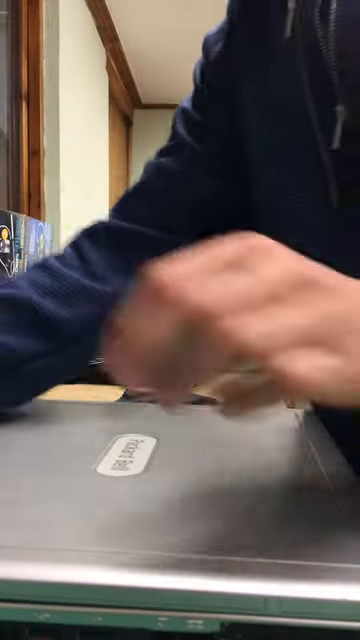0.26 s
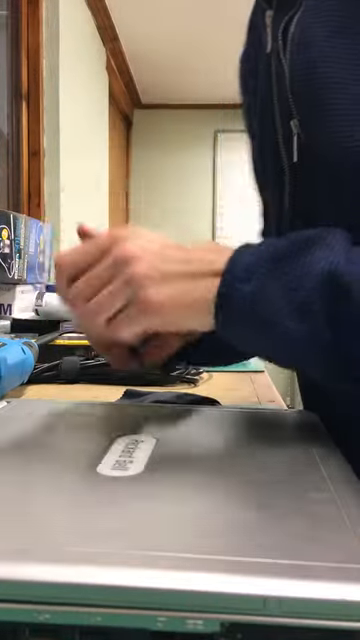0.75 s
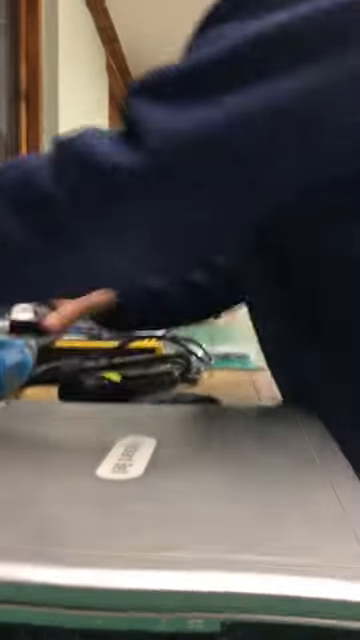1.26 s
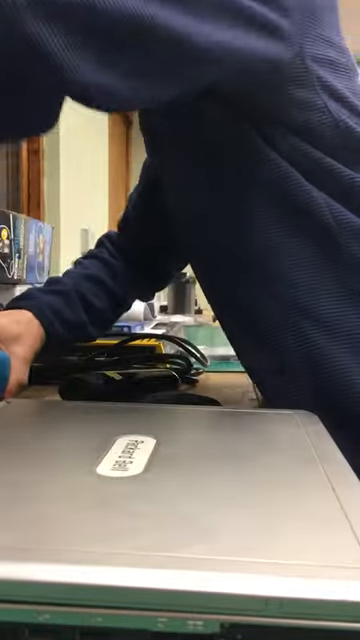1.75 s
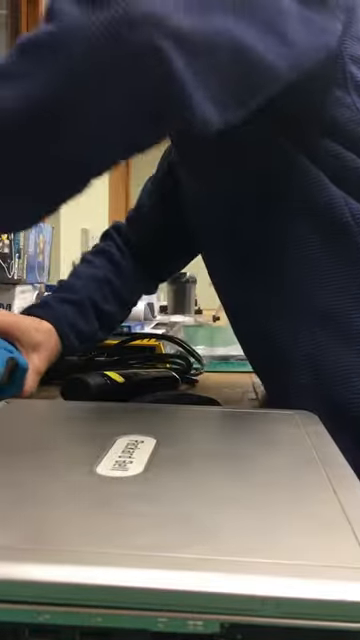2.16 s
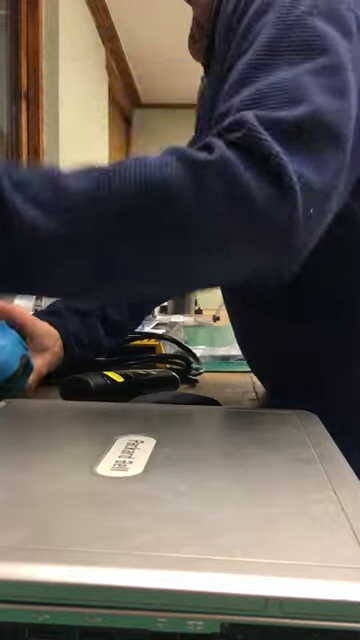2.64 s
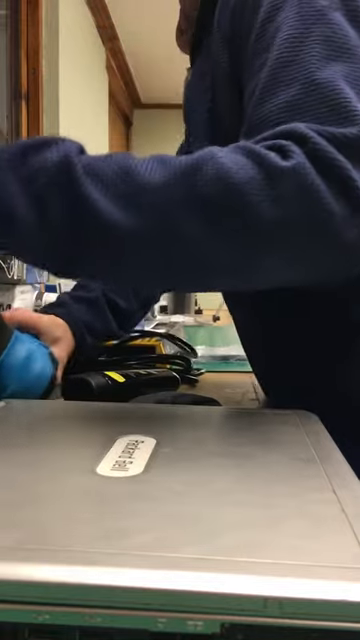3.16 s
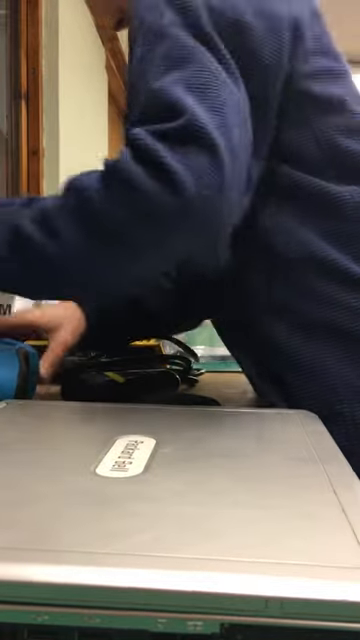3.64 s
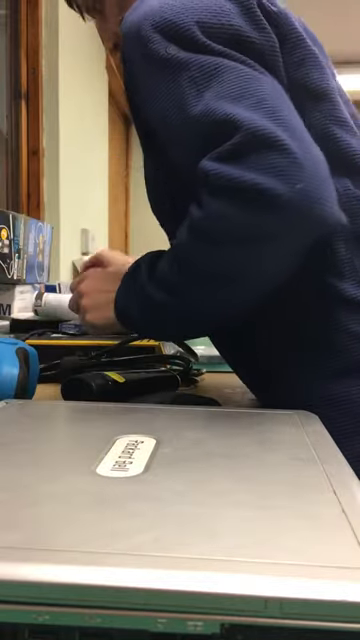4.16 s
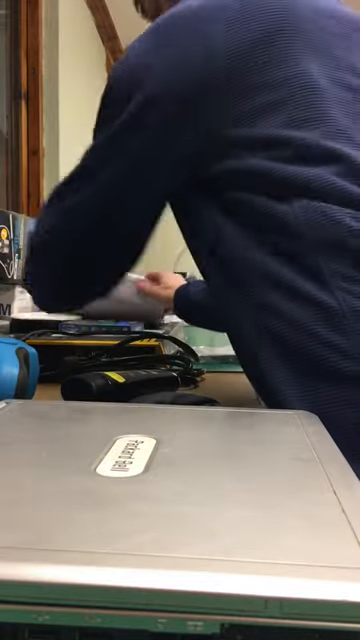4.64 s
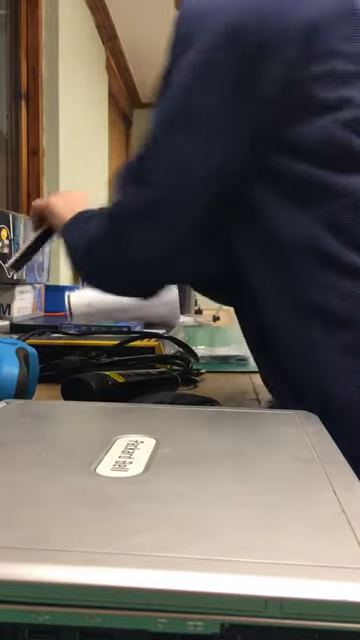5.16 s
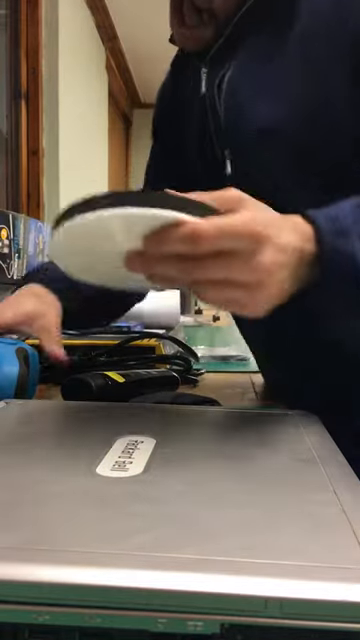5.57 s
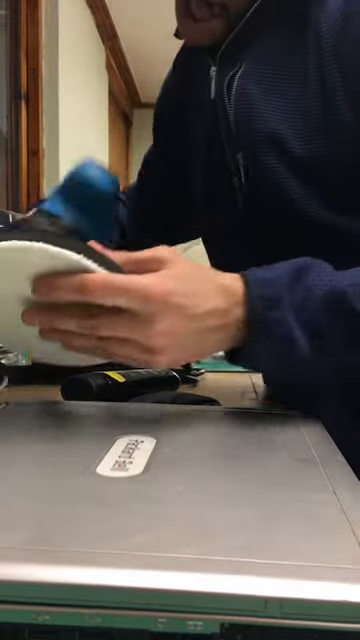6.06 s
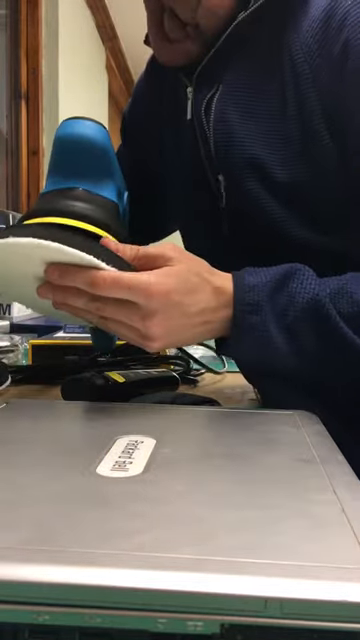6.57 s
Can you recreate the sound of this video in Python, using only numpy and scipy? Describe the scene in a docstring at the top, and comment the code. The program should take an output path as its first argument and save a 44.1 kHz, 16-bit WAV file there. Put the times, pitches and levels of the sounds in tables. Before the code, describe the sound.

Quiet room tone and low hum, heard from the bench itself. Soft cloth swishes lead to a woody knock, then small pops grow into an uneven, harsh fastener rip. Two deep bumps follow, the second loudest with clattering. After a lull come crisp packing crackles and clacks, a quick hand brush, faint handling and one last dull tap.

```python
"""A small workshop with mains hum, heard by a phone standing on the bench where hands are at work.
A polisher is set down and rocks: knocks ring tuned bench modes, and pushes boom as slow decaying sines.
Its hook-and-loop pad is torn off in jerks, made of dense noise grains that also shake the backing plate.
Small parts clack and paper slaps as band-passed noise; packing crinkles and sleeves rustle in grains."""
import sys
import numpy as np
from scipy import signal
from scipy.fft import rfft, irfft, next_fast_len
from scipy.io import wavfile
from scipy.ndimage import uniform_filter1d

SR = 44100
rng = np.random.default_rng(int(sys.argv[2]) if len(sys.argv) > 2 else 0)


def wav_out(sig):
    """Save sig, one row per channel (or a flat mono array), as 16-bit PCM at SR to the path in sys.argv[1]."""
    wavfile.write(sys.argv[1], SR, np.round(np.clip(np.atleast_2d(sig).T, -1, 1) * 32767).astype(np.int16))


N = 300321


def undb(db):
    """Gain of a dB value."""
    return 10 ** (np.asarray(db) / 20)


def level(x, db):
    """Scale x to an rms level in dB."""
    return x * undb(db) / np.sqrt(np.mean(x ** 2))


def fade(t, t60):
    """Exponential decay that falls 60 dB in t60 seconds."""
    return np.exp(-np.log(1000) * t / t60)


def colour(x, spectrum):
    """Filter x by a spectrum of (Hz, dB) points, joined along log frequency; rms 1."""
    hz, db = np.transpose(spectrum)
    size = next_fast_len(len(x))
    f = np.maximum(np.arange(size // 2 + 1) * SR / size, 1)
    gain = undb(np.interp(np.log(f), np.log(hz), db))
    return level(irfft(rfft(x, size) * gain, size)[:len(x)], 0)


def curve(table, column):
    """Gain over time, joining the values of one dB column in straight dB lines."""
    rows = np.array(table)
    return undb(np.interp(np.arange(N) / SR, rows[:, 0], rows[:, column]))


def walk(rate):
    """Random levels held 1 / rate s with slewed steps; spread near 1."""
    hold = int(SR / rate)
    steps = np.repeat(rng.standard_normal(N // hold + 1), hold)
    return uniform_filter1d(steps, hold // 2 + 1)[:N]


def grains(rate, spread_db, smear_s):
    """Random bursts, rate a second, a few much larger than the rest, each a short puff of fresh noise."""
    when, size = rng.random((2, N))
    power = (when < rate / SR) * undb(-2 * spread_db * np.log(size + 0.0055))
    keep = fade(2 / SR, smear_s)  # two samples' amplitude decay is one sample's power decay
    return np.sqrt(signal.lfilter([1], [1, -keep], power)) * rng.standard_normal(N)


def add(out, s, sound, db):
    """Mix a sound in at s seconds with the given peak in dB."""
    i = int(s * SR)
    out[i:i + len(sound)] += (sound * undb(db) / np.abs(sound).max())[:N - i]


def band(x, hz, width):
    """Resonant band-pass."""
    return signal.lfilter(*signal.iirpeak(hz, hz / width, SR), x)


def double_band(x, hz, width):
    """Two equal band-passes in a row, for steeper skirts."""
    return band(band(x, hz, width), hz, width)


def treble(noise):
    """The bright top of a noise."""
    return double_band(noise, 10000, 9300)


# Room tone. Each row: frequency in Hz, relative density in dB per Hz.
AIR_SPECTRUM = [(76, -19.5), (130, -6.5), (156, -11), (228, -8.5), (472, -21.5), (554, -18.5), (863, -27.5),
                (2320, -30.5), (4980, -38), (11400, -44.5), (16000, -45.5)]
# Mains hum. Each row: frequency in Hz, rms level in dB that the flicker moves around.
HUM_TONES = [(100, -55.5), (200, -71)]
AIR_DB = -62.5  # the breathing moves around this
RUMBLE_HZ, RUMBLE_WIDTH_HZ, RUMBLE_DB = 59, 30, -57.5


def air():
    """Coloured noise that breathes a little, a wavering mains hum and the bench trembling at rest."""
    t = np.arange(N) / SR
    tone = undb(AIR_DB + 0.8 * walk(1.93)) * colour(rng.standard_normal(N), AIR_SPECTRUM)
    hum = np.zeros(N)
    for hz, db in HUM_TONES:
        flicker = undb(db + 3.5 * walk(15))
        wander = 1.3 * walk(5.3)  # phase in radians
        hum += flicker * np.sqrt(2) * np.sin(2 * np.pi * hz * t + wander)
    rumble = double_band(rng.standard_normal(N), RUMBLE_HZ, RUMBLE_WIDTH_HZ)
    return tone + hum + level(rumble, RUMBLE_DB)


# How long the walls answer. Each row: frequency in Hz, t60 in seconds.
ROOM_DECAY = [(250, 0.42), (1000, 0.18), (4000, 0.25), (12000, 0.15)]
ROOM_DB = -9  # energy of the echoes against the dry sound


def room(dry):
    """Diffuse echoes: decaying noise, octave by octave, the lowest octaves lasting longest."""
    t = np.arange(SR) / SR
    hz, t60 = np.transpose(ROOM_DECAY)
    tail = np.zeros(SR)
    for f in 180 * 2. ** np.arange(7):
        octave = level(band(rng.standard_normal(SR), f, f), 0)
        octave_t60 = np.interp(np.log(f), np.log(hz), t60)
        tail += np.sqrt(f) * octave * fade(t, octave_t60)
    tail = tail * (t > 0.004)  # short gap before the first echoes
    tail = tail * undb(ROOM_DB) / np.sqrt(np.sum(tail ** 2))
    return signal.fftconvolve(dry, tail)[:N]


# Sleeves and hands at work. Each row: time in seconds, swish level in dB, rubbing level in dB.
RUSTLE_LEVELS = [(0.0, -62, -68.5), (0.25, -61, -57.5), (0.55, -70, -68.5), (0.575, -53.5, -85),
                 (0.66, -55.5, -67), (0.75, -62.5, -61.5), (1.38, -60.5, -62), (1.49, -50, -57.5),
                 (1.62, -59.5, -54), (2.85, -59.5, -59), (3.19, -65, -61), (3.34, -72, -71),
                 (3.43, -57, -71.5), (3.56, -61, -56.5), (3.73, -75, -39), (3.81, -73, -56),
                 (4.0, -69.5, -60), (4.43, -70.5, -66.5), (4.56, -48, -43.5), (4.7, -51, -52),
                 (4.86, -48, -53.5), (4.99, -53.5, -48.5), (5.11, -53.5, -54), (5.17, -54.5, -48),
                 (5.31, -54.5, -52.5), (5.42, -63.5, -60.5), (5.61, -57.5, -64), (5.74, -68, -68),
                 (5.76, -59, -61), (5.95, -58.5, -55), (6.0, -56.5, -44), (6.12, -58.5, -53),
                 (6.23, -69, -61.5), (6.57, -72, -63), (6.81, -78, -82.5)]
# Cloth swish. Each row: frequency in Hz, relative density in dB per Hz.
CLOTH_SPECTRUM = [(1180, -9), (2000, -1.5), (2440, -3.5), (2960, -6.5), (4120, 3), (4900, -2), (6090, 0.5),
                  (15100, -9.5), (16000, -4.5)]
# Rubbing. Each row: frequency in Hz, relative density in dB per Hz.
RUB_SPECTRUM = [(88, -27), (150, -5), (257, 2), (398, -5), (442, -14), (583, -8.5), (866, -10), (2910, -17),
                (3500, -19.5), (4550, -52), (7700, -120)]
SWISH_FLICKER_DB, RUB_FLICKER_DB = 2.2, 2.0


def rustle():
    """Cloth swishes in fine, dense grains; palms and cables rub in sparser, longer ones."""
    swish = undb(SWISH_FLICKER_DB * walk(30)) * grains(3000, 0.5, 0.016)
    rub = undb(RUB_FLICKER_DB * walk(30)) * grains(500, 1.95, 0.043)
    swish = curve(RUSTLE_LEVELS, column=1) * colour(swish, CLOTH_SPECTRUM)
    rub = curve(RUSTLE_LEVELS, column=2) * colour(rub, RUB_SPECTRUM)
    return swish + rub


# Quick brushes of skin and cloth.
# Each row: start in seconds, peak in dB, centre in Hz, treble in dB against that peak.
BRUSH_STROKES = [(0.022, -49, 1130, 4.5), (0.2, -49, 5560, 13.5), (0.263, -47.5, 5600, -5),
                 (0.328, -54.5, 2130, 6), (0.725, -46, 1130, -25), (5.262, -45, 3860, 1),
                 (5.543, -34, 4870, -7.5), (5.748, -51, 4570, -2), (6.052, -47, 1070, 0),
                 (6.691, -59.5, 1485, -4)]
BRUSH_S = 0.04


def brushes():
    """Friction noise that swells and fades within a few hundredths of a second."""
    out = np.zeros(N)
    length = int(BRUSH_S * SR)
    for s, db, hz, treble_db in BRUSH_STROKES:
        body, top = rng.standard_normal((2, length)) * np.hanning(length)
        add(out, s, double_band(body, hz, 0.68 * hz), db)
        add(out, s, treble(top), db + treble_db)
    return out


# Paper and packing gripped.
# Each row: start in seconds, crackle level in dB, body level in dB, settling t60 in seconds.
GRIPS = [(3.668, -38, -52, 0.19), (3.735, -39, -55, 0.053), (4.426, -36, -34.5, 0.42),
         (4.46, -49, -33, 0.18), (4.492, -34.5, -43, 0.28)]
# Paper crackle. Each row: frequency in Hz, relative density in dB per Hz.
PAPER_SPECTRUM = [(880, -36.5), (1500, -20), (2300, 2.5), (3410, -9), (4120, 1.5), (8400, -2.5),
                  (16000, -16)]
# Backing plate, also the dull body of the crinkle.
# Each row: frequency in Hz, relative density in dB per Hz.
PLATE_SPECTRUM = [(88, -30), (150, -5), (188, -1.5), (335, -5), (469, -10.5), (1100, 1), (1540, -4.5),
                  (1710, -4.5), (3000, -13.5), (3900, -12), (6600, -120)]
CRINKLE_RISE_S = 0.0071


def crinkle():
    """Creases buckle in quick, uneven pops that weaken as each grip settles."""
    t = np.arange(N) / SR
    pops = undb(3.1 * walk(60)) * grains(700, 2.0, 0.021)
    crackle, body = colour(pops, PAPER_SPECTRUM), colour(pops, PLATE_SPECTRUM)
    out = np.zeros(N)
    for s, crackle_db, body_db, t60 in GRIPS:
        grip = np.clip((t - s) / CRINKLE_RISE_S, 0, 1) * fade(np.abs(t - s), t60)
        out += grip * (undb(crackle_db) * crackle + undb(body_db) * body)
    return out


# t60 is that of the noise driving the ring
SNAP_S, SNAP_DB, SNAP_HZ, SNAP_WIDTH_HZ, SNAP_T60_S = 0.408, -36, 1840, 170, 0.033


def snap():
    """A small part snaps home: a noise burst excites one short, slightly rough ring."""
    out, t = np.zeros(N), np.arange(SR // 5) / SR
    burst = rng.standard_normal(len(t)) * fade(t, SNAP_T60_S)
    add(out, SNAP_S, band(burst, SNAP_HZ, SNAP_WIDTH_HZ), SNAP_DB)
    return out


STRIKE_SHARE, TAIL_DB = 0.22, -3.5  # the strike lasts a share of the tail


def clack(ring_hz, crack_db, edge_db, t60):
    """A noisy ring, a broad crack and a bright, shorter edge; a sharp strike leads a weaker tail."""
    t = np.arange(SR // 5) / SR
    noise = rng.standard_normal((3, len(t))) * (1 - np.exp(-t / 0.00059))
    blow = fade(t, STRIKE_SHARE * t60) + undb(TAIL_DB) * fade(t, t60)
    ring = band(noise[0] * blow, ring_hz, 0.31 * ring_hz)
    crack = double_band(noise[1], max(ring_hz, 2700), 4500) * blow
    edge = treble(noise[2]) * fade(t, 0.081 * t60)
    parts = zip((ring, crack, edge), (0, crack_db, edge_db))
    return sum(undb(db) * part / np.abs(part).max() for part, db in parts)


# Clacks of small parts and slaps of paper.
# Each row: start in seconds, peak in dB, ring in Hz, crack in dB against the ring.
CLACKS = [(0.408, -41.5, 5160, 6), (0.998, -46, 1100, -8), (1.188, -25.5, 756, -23), (1.201, -19, 1000, -6),
          (1.276, -37.5, 1070, -22), (1.316, -42, 799, -20), (1.582, -31, 3000, -9), (1.595, -35, 1080, -3),
          (2.93, -46, 4200, -5), (3.012, -38, 670, -21), (3.438, -36.5, 3240, 8), (3.574, -16.5, 700, -18),
          (3.595, -33.5, 5940, -9), (3.609, -25.5, 760, 5), (3.669, -21.5, 1170, -4),
          (3.69, -29.5, 1300, 1), (3.735, -26, 1470, 2), (3.754, -32, 4830, -8), (3.785, -37.5, 2480, -13),
          (3.834, -37.5, 754, -18), (3.877, -42.5, 800, -5), (3.94, -38, 754, -17), (3.998, -44, 700, -19),
          (4.432, -28, 1090, 6), (4.498, -19.5, 1260, 1.5), (4.543, -18, 1310, 0), (4.618, -23, 1000, 1.5),
          (4.638, -29.5, 2750, 2), (4.709, -25.5, 1540, 0.5), (4.903, -20.5, 1560, 6),
          (4.949, -29.5, 1440, -5), (5.085, -32.5, 1010, -3), (5.209, -34, 715, 1.5),
          (5.246, -35.5, 920, -11), (5.815, -44.5, 1030, -15), (5.907, -41.5, 1050, -13),
          (5.944, -36, 796, -26), (5.954, -40, 1280, -17), (5.967, -39, 700, -25), (5.996, -43, 872, -17),
          (6.01, -48, 5000, -3), (6.022, -37, 1580, 1.5), (6.066, -38, 2000, 8), (6.15, -46, 1150, -11),
          (6.3, -26, 800, -14.5), (6.31, -33, 1700, -16), (6.407, -49, 794, 4)]
# Lone pops of the first hooks to let go. Each row: start in seconds, peak in dB.
HOOK_POPS = [(1.613, -26.5), (1.634, -25.5), (1.655, -27), (1.666, -18.5), (1.682, -22), (1.705, -15),
             (1.722, -19), (1.744, -22), (1.78, -22)]
CLACK_T60_S, EDGE_DB = 0.068, -23  # the edge lies under the crack
POP_HZ, POP_CRACK_DB, POP_EDGE_DB, POP_T60_S = 5600, 1, 4.5, 0.06  # dB against the ring


def clacks():
    """Small parts and slapped paper sound as noisy rings; single hooks pop the same way, high and bright."""
    out = np.zeros(N)
    for s, db, hz, crack_db in CLACKS:
        add(out, s, clack(hz, crack_db, crack_db + EDGE_DB, CLACK_T60_S), db)
    for s, db in HOOK_POPS:
        add(out, s, clack(POP_HZ, POP_CRACK_DB, POP_EDGE_DB, POP_T60_S), db)
    return out


# Pushes that set the whole bench swaying. Each row: start in seconds, peak in dB, sway in Hz.
PUSHES = [(0.081, -39, 79.5), (1.006, -51, 83), (1.203, -22, 82.5), (1.319, -29.5, 76.5),
          (1.387, -33.5, 76), (1.465, -36, 63), (1.58, -29, 63), (1.72, -31.5, 67.5), (1.845, -37.5, 69),
          (1.949, -40, 64), (2.038, -35, 65), (2.142, -38, 81), (2.198, -34.5, 68), (2.375, -46, 59),
          (2.458, -41, 63), (2.682, -40, 65), (3.028, -19, 65.8), (3.108, -34, 66), (3.158, -34.5, 59),
          (3.229, -44.5, 57), (3.585, -11, 71), (3.709, -23.5, 66), (3.8, -39, 65.5), (3.846, -38, 70),
          (3.94, -35.5, 72), (4.028, -42, 65), (4.479, -45, 58.5), (4.878, -45, 82), (5.555, -33, 66.5),
          (5.61, -40, 56.7), (5.703, -40, 56), (5.79, -40, 56), (5.846, -36.5, 56.6), (6.098, -36, 71.6)]
SWAY_T60_S = 0.15


def bumps():
    """A soft push: the sway builds over about two cycles, then dies."""
    out, t = np.zeros(N), np.arange(SR // 2) / SR
    build_and_die = (1 - np.exp(-t / 0.011)) ** 2 * fade(t, SWAY_T60_S)
    for s, db, hz in PUSHES:
        add(out, s, build_and_die * np.sin(2 * np.pi * hz * t), db)
    return out


# Knocks on the bench top.
# Each row: start in seconds, low peak in dB, main ring in Hz, hard edge in dB against the low peak.
BENCH_KNOCKS = [(0.089, -34, 139, -27), (0.276, -40, 146, -11), (0.997, -39, 210, -7),
                (1.019, -35.5, 130, -7), (1.191, -9.5, 198, -12.5), (1.234, -21, 185, -26),
                (1.28, -17.5, 198, -11), (1.32, -22.5, 173, -31), (1.348, -28, 199, -29),
                (1.709, -34.5, 208, -20), (1.955, -38.5, 254, -5), (2.145, -31, 194, -7),
                (2.674, -33.5, 361, 4.5), (2.769, -29.5, 226, -23), (3.013, -28, 241, -3),
                (3.572, -16, 288, -16), (3.608, -26, 328, 1), (3.67, -26.5, 425, 8.5),
                (3.722, -30.5, 378, 0), (3.785, -36, 426, 7.5), (3.88, -39, 384, 0), (3.943, -46, 450, 9.5),
                (3.995, -43.5, 380, 4.5), (4.458, -27.5, 339, -3), (4.479, -34, 166, -21),
                (4.541, -36.5, 257, 5), (4.885, -35.5, 145, -1.5), (5.543, -45.5, 132, -9),
                (5.866, -43, 134, 0), (5.964, -35.5, 448, 0), (5.998, -47, 203, -15),
                (6.059, -43.5, 188, -5), (6.118, -37.5, 135, -17), (6.303, -27, 320, 1),
                (6.406, -34.5, 327, -26), (6.449, -47, 312, -23)]
# Bench modes, varied at every blow.
# Each row: nominal frequency in Hz, nominal relative level in dB, t60 in seconds.
BENCH_MODES = [(114.3, -7.5, 0.24), (194, 2.5, 0.1), (260, 0, 0.099), (313, -0.5, 0.052),
               (432, -12.5, 0.054), (563, -6.5, 0.046), (640, -6.5, 0.03), (950, -15, 0.0089),
               (1070, -15.5, 0.016), (1300, -7, 0.012), (1816, -23.5, 0.02)]
RING_CYCLES, KNOCK_T60_S, CHATTER_T60_S = 4.4, 0.049, 0.027  # a low ring lasts longer


def knocks():
    """Each blow rings the bench modes; a short chatter of the contact roughens the upper ones."""
    out, t = np.zeros(N), np.arange(SR // 2) / SR
    for s, db, hz, hard_db in BENCH_KNOCKS:
        chatter = 0.13 * rng.standard_normal(len(t)) * fade(t, CHATTER_T60_S)
        contact = chatter + (t == 0)  # one clean impulse leads
        low = np.sin(2 * np.pi * hz * t) * fade(t, KNOCK_T60_S + RING_CYCLES / hz)
        high = np.zeros(len(t))
        for mode_hz, mode_db, mode_t60 in BENCH_MODES:
            detune, scatter = rng.standard_normal(2)
            tone = np.sin(2 * np.pi * mode_hz * (1 + 0.039 * detune) * t)
            ring = undb(mode_db + 4.0 * scatter) * tone * fade(t, mode_t60)
            if mode_hz < 500:
                low += undb(-9) * ring
            else:
                high += ring
        add(out, s, low * (1 - np.exp(-t / 0.0043)), db)
        add(out, s, signal.fftconvolve(high, contact)[:len(t)], db + hard_db)
    return out


def jerk(t, s, length, first_db, middle_db, last_db):
    """The pull of one jerk, a smooth parabola in dB through its three levels."""
    u = np.clip(2 * (t - s) / length - 1, -1, 1)
    slope = (last_db - first_db) / 2
    bend = (first_db + last_db) / 2 - middle_db
    return undb(middle_db + u * slope + u ** 2 * bend) * (np.abs(u) < 1)


# Jerks that tear the hook-and-loop pad, before their edges are softened.
# Each row: start in seconds, length in seconds, pull in dB at the start, halfway and at the end.
TEAR_JERKS = [(1.625, 0.19, -46, -37, -48), (1.813, 0.046, -41.5, -39, -33),
              (1.884, 0.044, -38.5, -34.5, -47), (1.941, 0.12, -32, -30.5, -32),
              (2.068, 0.049, -31, -34.5, -33.5), (2.121, 0.2, -31.5, -27, -37),
              (2.33, 0.022, -28, -27.5, -33), (2.378, 0.14, -40.5, -24.5, -43.5),
              (2.531, 0.07, -34.5, -33.5, -45.5), (2.605, 0.047, -44, -44.5, -42),
              (2.655, 0.094, -27, -22, -26)]
# Snapping hooks. Each row: frequency in Hz, relative density in dB per Hz.
HOOK_SPECTRUM = [(880, -33), (1500, -9), (2460, -2), (2660, -5.5), (3810, 1.5), (6310, 2.5), (9560, 0),
                 (10500, -5.5), (12000, -1), (16000, -7.5)]
# The plate rings more freely as the pad comes loose.
# Each row: time in seconds, plate level in dB against the hooks.
PLATE_LOOSENING = [(1.6, -12), (2.5, -9.5), (2.73, -2.5)]
TEAR_EDGE_S = 0.0049


def tear():
    """Hooks snap free in uneven bunches, more densely the harder the pull; snaps shake the backing plate."""
    t = np.arange(N) / SR
    pull = sum(jerk(t, *row) for row in TEAR_JERKS)
    pull = uniform_filter1d(pull, int(TEAR_EDGE_S * SR))
    rate = np.clip(2400 * pull / undb(-29.5), 350, 4000)  # snaps a second
    # dividing by the root of the rate leaves the loudness to the pull
    snaps = undb(1.56 * walk(70)) * grains(rate, 2.2, 0.0054) / np.sqrt(rate)
    hooks = colour(snaps, HOOK_SPECTRUM)
    plate = curve(PLATE_LOOSENING, column=1) * colour(snaps, PLATE_SPECTRUM)
    return pull * (hooks + plate)


def scene():
    """Knocks, clacks, brushes, packing and tear excite the room; sway, rustle and air stay dry."""
    near = brushes() + crinkle() + snap() + clacks() + knocks() + tear()
    # the sway reaches the phone through the bench
    return (air() + room(near) + rustle() + bumps() + near)[None]


LOW_CUT_HZ, TOP_HZ = 24, 15800


def record(dry):
    """The phone thins the deepest bass and cuts the top steeply."""
    low_cut = signal.butter(2, LOW_CUT_HZ, "high", fs=SR, output="sos")
    top_cut = signal.ellip(14, 0.2, 110, TOP_HZ, fs=SR, output="sos")
    return signal.sosfilt(top_cut, signal.sosfilt(low_cut, dry))


dry = scene()
out = record(dry)
wav_out(out)
```